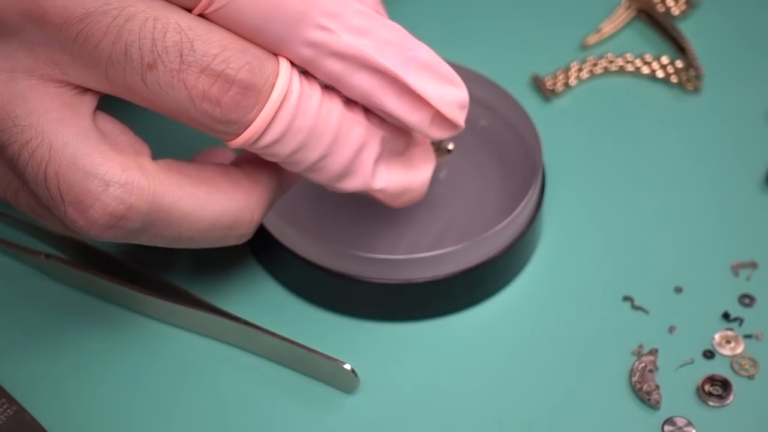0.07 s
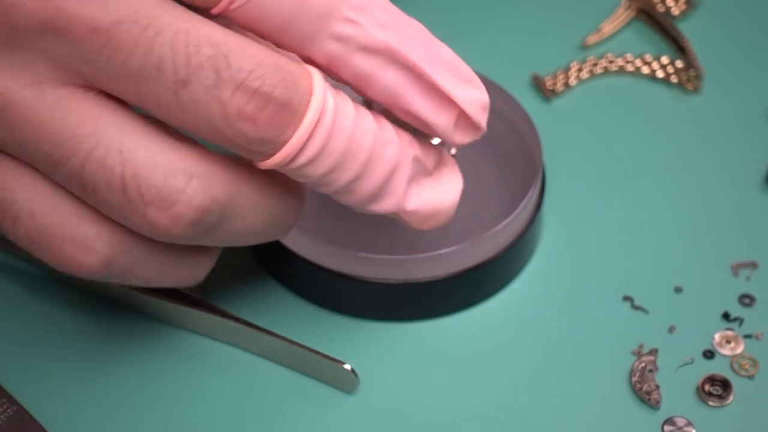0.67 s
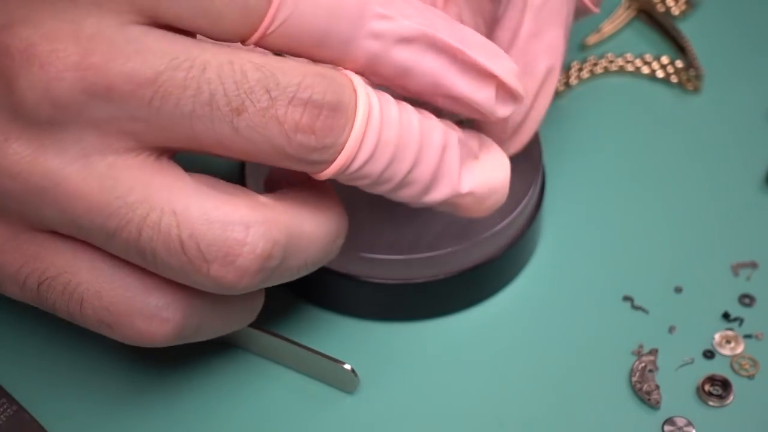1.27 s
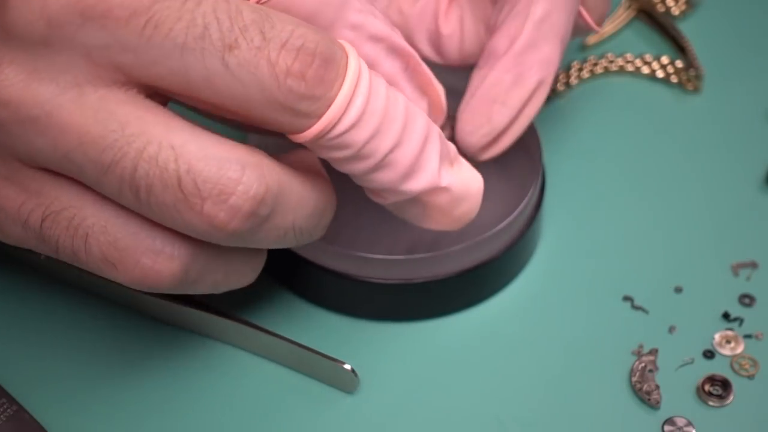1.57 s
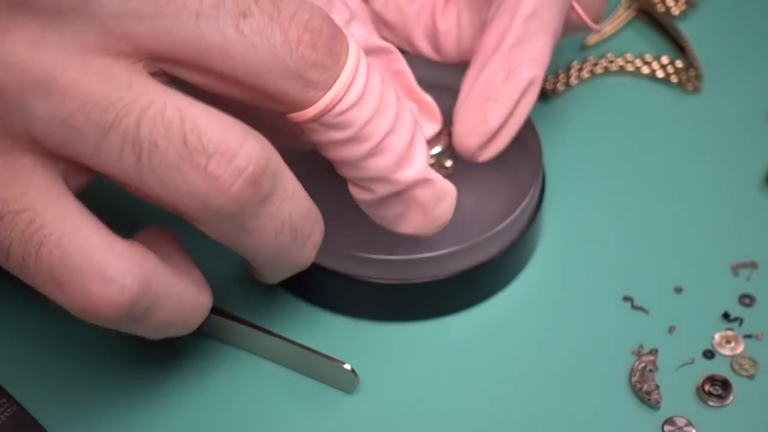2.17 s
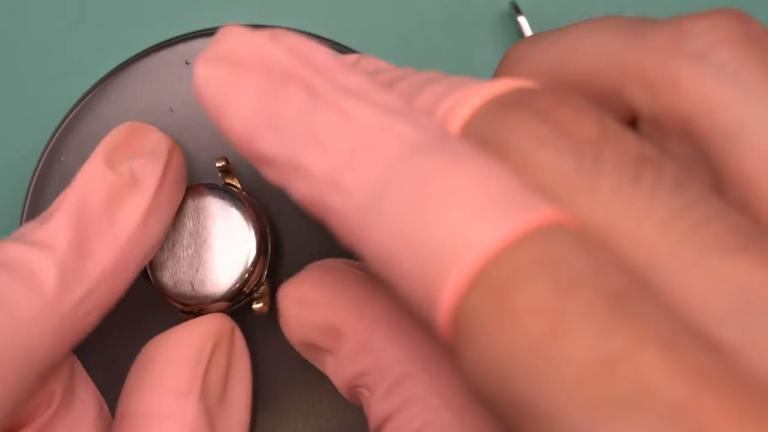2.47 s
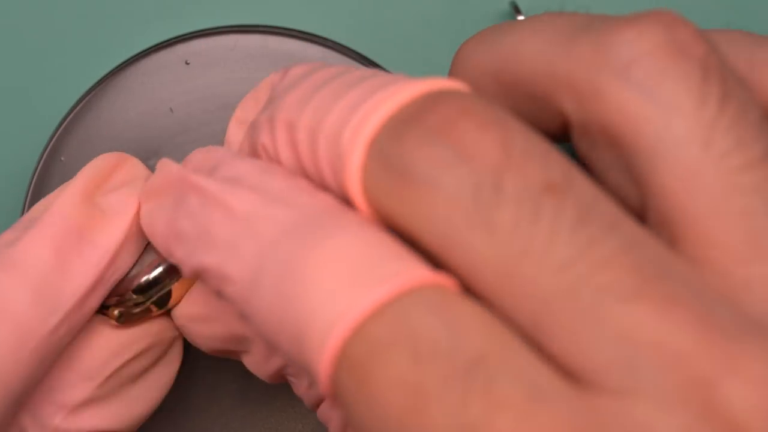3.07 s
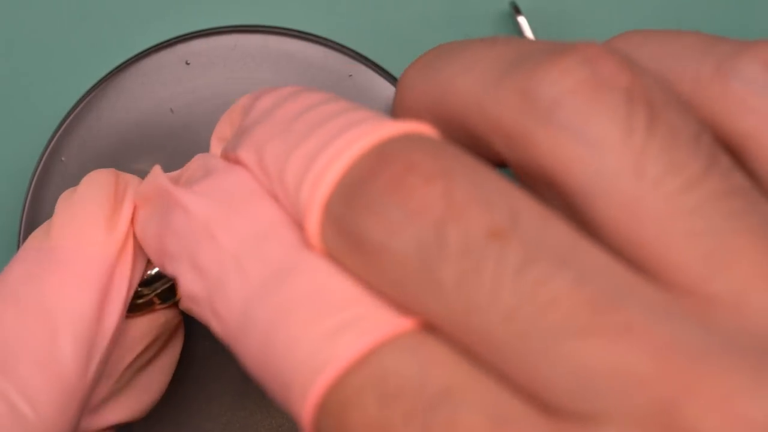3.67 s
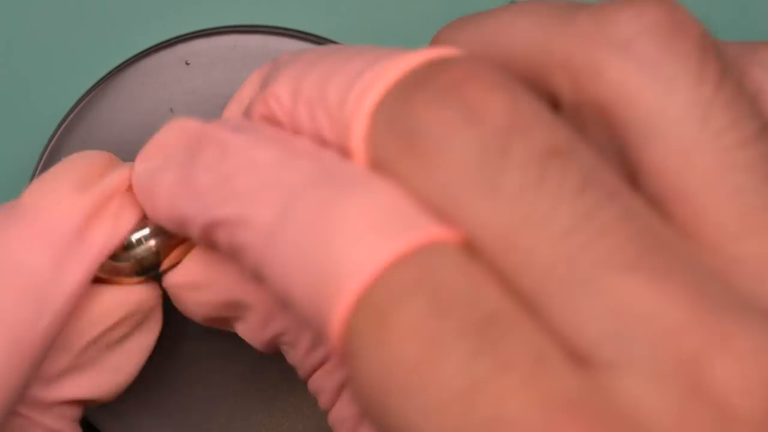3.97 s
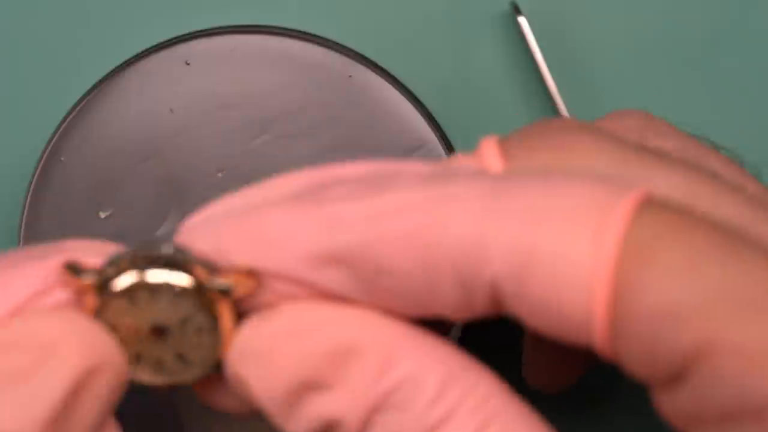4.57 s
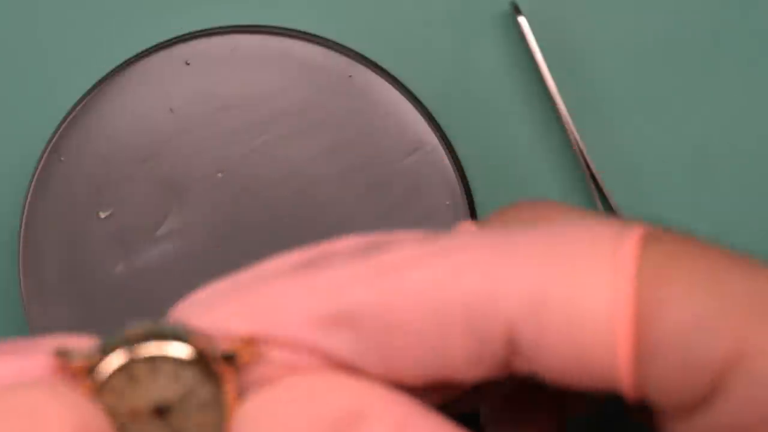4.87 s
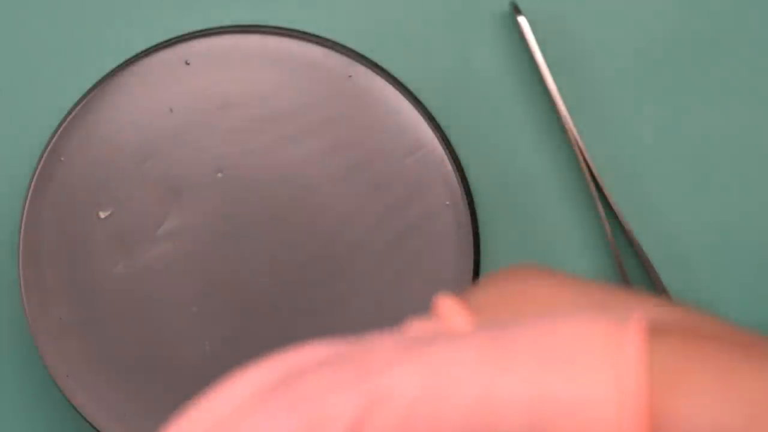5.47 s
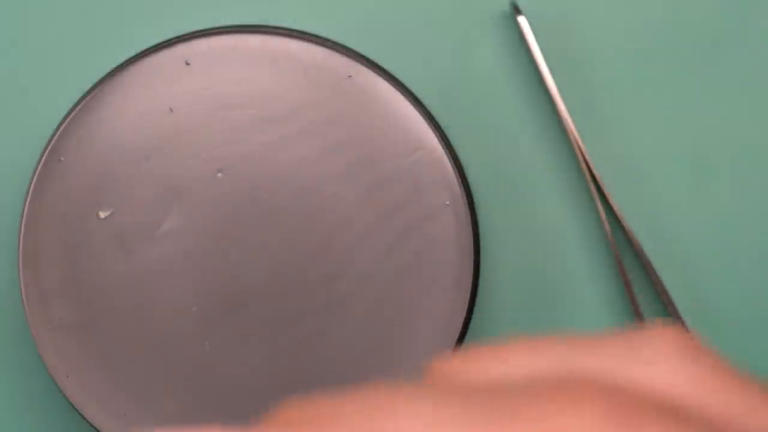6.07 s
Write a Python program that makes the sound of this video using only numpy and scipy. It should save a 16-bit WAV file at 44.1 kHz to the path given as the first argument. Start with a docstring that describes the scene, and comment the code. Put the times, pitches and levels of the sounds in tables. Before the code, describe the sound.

Rubber-covered fingers rub a small steel watch case, with one sharp snap and a later, fainter click over a soft fan hum.

```python
"""A small steel watch case is handled on a cushion, close by in a quiet room, by fingers in rubber covers.
Loose metal parts clink as they are put down. The case back snaps shut, ringing briefly and thumping
the bench, and a fainter click follows later. All along, the rubber sticks and slips on the steel,
which makes rubbing, ticks and short swishes. A fan hums steadily behind it all."""
import sys
import numpy as np
from scipy import signal
from scipy.fft import rfft, irfft
from scipy.io import wavfile

SR = 44100
rng = np.random.default_rng(int(sys.argv[2]) if len(sys.argv) > 2 else 0)


def master(y):
    """Save y as 16-bit WAV."""
    cut = np.clip(np.atleast_2d(y).T, -1, 1)
    pcm = np.round(cut * 32767)  # scale
    wavfile.write(sys.argv[1], SR, pcm.astype(np.int16))


N = 279594
T = np.arange(N) / SR

# The case back's first touch, snap and bounces. Each row: start in seconds, peak level in dB.
SNAP_HITS = [(1.96993, -31.5), (1.9707, -9), (1.97118, -14), (1.97249, -20.5), (1.9744, -30)]
SNAP_S = SNAP_HITS[1][0]  # the loudest hit


def amp(db):
    """Turns decibels into a number to multiply by."""
    return 10 ** (np.asarray(db) / 20)


def unit_level(x):
    """Scales a sound so that its average level (rms) is 1."""
    return x / np.sqrt(np.mean(x ** 2) + 1e-20)


def read_curve(points, hz):
    """Reads between a table's rows along a pitch-like (logarithmic) frequency scale."""
    point_hz, values = np.transpose(points)
    return np.interp(np.log(hz + 1), np.log(point_hz + 1), values)


def add(mix, start, sound):
    """Lays a sound into the mix at a start time in seconds."""
    part = mix[max(round(start * SR), 0):][:len(sound)]
    part += sound[:len(part)]


def filtered(x, curve):
    """Turns each frequency up or down along a curve of (Hz, dB) points."""
    freqs = np.fft.rfftfreq(len(x), 1 / SR)
    return irfft(rfft(x) * amp(read_curve(curve, freqs)), len(x))


def resonant(x, hz, width):
    """Keeps one steep-sided band of frequencies, at level 1."""
    freqs = np.fft.rfftfreq(len(x), 1 / SR)
    cut = np.sqrt(1 + (2 * (freqs - hz) / width) ** 4)
    return unit_level(irfft(rfft(x) / cut, len(x)))


def drift(rate_hz):
    """A smooth random wobble, typically 1 in size."""
    return resonant(rng.standard_normal(N), 0, 2 * rate_hz)


def grains(size, per_s, spread_db):
    """Surfaces catch and let go: many tiny clicks of uneven size at random times."""
    releases = rng.standard_normal(size) * (rng.random(size) < per_s / SR)
    return releases * amp(spread_db * np.minimum(rng.exponential(1, size), 4))


def swell(start, length, rise_share=0.25, fall_share=0.35):
    """A loudness shape that rises, holds and falls back to silence."""
    progress = (T - start) / length
    ramp = np.minimum(progress / rise_share, (1 - progress) / fall_share)
    return np.sin(np.pi / 2 * np.clip(ramp, 0, 1))


def burst(mix, peak_s, db, hz, width, rise_s, fall_s):
    """Adds a patch of tiny clicks that builds to a peak and dies away."""
    t = np.arange(-SR // 10, SR // 10) / SR
    shape = np.exp(-abs(t) / np.where(t < 0, rise_s, fall_s))
    friction = resonant(grains(len(t), per_s=12000, spread_db=0.5), hz, width)
    add(mix, peak_s + t[0], amp(db) * shape * friction)


def ring(tones):
    """Struck steel rings, scaled to peak 1; wider tones die sooner, and neighbours swing opposite ways."""
    t = T[:SR // 20]
    sound = sum((-1) ** k * amp(db) * width * np.exp(-np.pi * width * t) * np.sin(2 * np.pi * hz * t)
                for k, (hz, width, db) in enumerate(tones))
    return sound / abs(sound).max()


def fan():
    """A fan makes steady air noise, narrow ringing bands in its duct and two wavering hums."""
    # The tone of the moving air. Each row: frequency in Hz, relative level in dB.
    air_curve = [(15, -24), (28, -14.5), (40, -22.5), (65, -5.5), (90, -11), (115, -2), (250, -1.5),
                 (420, -6.5), (620, -11.5), (900, -7), (1350, -9.5), (1700, -14.5), (2250, -10.5),
                 (2600, -19), (3700, -21), (5200, -32), (7500, -35.5), (16000, -36)]
    # Where the duct rings. Each row: frequency in Hz, width in Hz, level in dB.
    duct_bands = [(491, 56, -67.5), (857, 25.35, -77), (968, 18, -74), (1026, 19, -74.5), (1229, 25, -82.5),
                  (1363, 38, -73), (2021, 39, -74), (2263, 100, -71.5)]
    # The hums. Each row: frequency in Hz, level in dB, pitch waver in Hz.
    hum_tones = [(119.2, -66.5, 3.92), (272.8, -62, 4.08)]
    air = amp(-55) * unit_level(filtered(rng.standard_normal(N), air_curve))
    duct = sum(amp(db) * resonant(rng.standard_normal(N), hz, width) for hz, width, db in duct_bands)
    hum = np.zeros(N)
    for hz, db, waver in hum_tones:
        flutter = amp(3.3 * drift(rate_hz=7.6))
        pitch = hz + waver * drift(rate_hz=7.97)
        hum += amp(db) * unit_level(flutter * np.sin(2 * np.pi * np.cumsum(pitch) / SR))
    return air + duct + hum


def clinks():
    """Loose parts chatter briefly at each touch and ring; a tiny part adds a thin, high ting."""
    # Each row: start in seconds, level in dB, chatter time in seconds, level of the ting in dB.
    touches = [(.029, -58, .004, -75), (.056, -55, 0.0067, -66), (.063, -49.5, 0.0041, -54),
               (.069, -53, .004, -60), (.098, -55.5, 0.0055, -68), (0.1834, -40.5, 0.0011, -69),
               (.188, -54, .002, -72), (0.2118, -45.5, 0.0064, -66), (.2208, -45.5, 0.0033, -52)]
    # How the loose parts ring. Each row: frequency in Hz, width in Hz, relative strength in dB.
    part_tones = [(2660, 200, -4), (3600, 420, 5.5), (4860, 330, -4), (6250, 590, 0), (8100, 270, -6),
                  (8800, 250, -2), (9700, 460, -2), (11200, 700, -12), (15100, 400, -15)]
    ting_hz, ting_fade_s = 10950, 0.0052
    contacts, tings, t = np.zeros(N), np.zeros(N), T[:SR // 20]
    ting = np.exp(-t / ting_fade_s) * np.sin(2 * np.pi * ting_hz * t)
    for start, db, chatter_s, ting_db in touches:
        chatter = unit_level(grains(len(t), per_s=7600, spread_db=-1.5))
        add(contacts, start, amp(db) * chatter * np.exp(-t / chatter_s))
        add(tings, start, amp(ting_db) * ting)
    ringing = ring(part_tones)
    return signal.oaconvolve(contacts, ringing / np.linalg.norm(ringing))[:N] + tings


def rubbing():
    """Sliding rubber sticks and slips, making a dull drag and a hiss that waver as the fingers move."""
    # Each row: start in seconds, length in seconds, level in dB, brightness in dB (higher is hissier).
    strokes = [(0.216, 0.13, -78, 8), (.51, 0.076, -69, 2), (.6, 0.24, -73.5, -2.5),
               (0.756, 0.42, -70.5, -0.5), (1.135, .11, -66.5, 2), (1.44, 0.27, -74, 3),
               (1.89, 0.25, -77, 5), (2.232, .1, -68, 4.5), (2.33, 0.12, -69, -2), (2.424, 0.27, -78, 8),
               (2.626, 0.093, -66, 0), (2.734, 0.17, -65, 2), (2.868, 0.26, -73, 4.5),
               (2.991, 0.042, -66.5, 4), (3.137, 0.13, -71.5, 3.5), (3.55, 0.28, -76, 2.5),
               (3.926, 0.068, -66, 0.5), (3.988, 0.14, -63.5, 2.5), (4.12, 0.31, -69, 1.5),
               (4.378, 0.24, -76, -3), (4.78, 0.52, -74.5, -3), (5.503, 0.75, -72, 0.5),
               (5.736, 0.24, -67.5, 4.5), (6.032, 0.064, -65, 1.5), (6.08, 0.087, -71, 8),
               (6.15, 0.21, -69, -4)]
    # The tone of the drag and of the hiss. Each row: frequency in Hz, relative level in dB.
    drag_curve = [(1500, -24.5), (2700, -4.5), (4300, -1), (5200, -2.5), (6400, 1), (7200, -10),
                  (9000, -17), (16000, -40)]
    hiss_curve = [(5000, -32.5), (7200, -11.5), (7900, 0), (9500, 0.5), (10200, -1), (11200, -9.5),
                  (12800, -9), (13800, -32), (15300, -20), (17000, -32)]
    drag_power, hiss_power = amp(-83) ** 2, amp(-81) ** 2  # a resting grip is never quite still
    for start, length, db, brightness_db in strokes:
        power = (amp(db) * swell(start, length)) ** 2
        drag_power = drag_power + power
        hiss_power = hiss_power + power * amp(brightness_db) ** 2
    drag = unit_level(filtered(grains(N, per_s=4000, spread_db=-0.5), drag_curve))
    hiss = unit_level(filtered(grains(N, per_s=10000, spread_db=2.5), hiss_curve))
    waver = amp(1.8 * drift(rate_hz=37))
    return waver * (amp(-0.5) * np.sqrt(drag_power) * drag + amp(-2.5) * np.sqrt(hiss_power) * hiss)


def ticks():
    """The grip ticks as it catches on an edge, and creeps under steady pressure in a run of fainter ticks."""
    # Single catches. Each row: time in seconds, level in dB, centre frequency in Hz.
    catches = [(.922, -58, 11000), (.995, -62, 9000), (2.365, -52, 9500), (2.411, -47.5, 8300),
               (2.659, -54.5, 9000), (3.279, -57, 8500), (3.708, -58, 6000), (3.759, -54.5, 7000),
               (3.769, -57, 6460), (3.811, -57, 5400), (3.874, -59, 5570), (4.02, -53, 8530),
               (4.381, -52, 7500), (5.781, -60, 8500), (6.047, -53, 8500)]
    creep_start_s, creep_end_s, creep_per_s = 3.46, 4.1, 30
    creep_db, creep_hz = -63.5, 5600
    creep = []
    for beat in np.arange(creep_start_s, creep_end_s, 1 / creep_per_s):
        late, force = rng.uniform(-1.1, 1, size=2)
        creep.append((beat + late / creep_per_s / 2, creep_db + 0.5 * force, creep_hz))
    out = np.zeros(N)
    for peak_s, db, hz in list(catches) + creep:
        burst(out, peak_s, db, hz, width=4200, rise_s=0.0006, fall_s=0.002)
    return out


def slips():
    """The rubber stretches, then lets go more quickly; the tighter it is, the higher it sounds."""
    # Each row: peak time in seconds, level in dB, centre in Hz, width in Hz, rough length in seconds.
    releases = [(1.227, -52.5, 6000, 3500, 0.009), (1.413, -69, 5800, 600, 0.078),
                (1.55, -68, 10600, 1400, .085), (2.27, -61, 11000, 1600, .05),
                (2.278, -60, 4600, 2000, 0.033), (2.797, -62.5, 3540, 2000, 0.077),
                (2.873, -46, 8240, 4500, 0.022), (3.179, -58.5, 5500, 1800, .022),
                (3.215, -59, 5540, 1000, .016), (3.965, -54.5, 5100, 2500, 0.017),
                (4.082, -59.5, 8000, 9000, .035), (4.23, -62, 10500, 2500, 0.065),
                (5.907, -50, 6540, 3360, 0.047), (6.219, -53.5, 3770, 2800, 0.013)]
    out, rise_share = np.zeros(N), 0.69
    for peak_s, db, hz, width, length in releases:
        burst(out, peak_s, db, hz, width, rise_share * length, (1 - rise_share) * length)
    return out


def steel_hits(hits, tones, scrape_db, scrape_fade_s):
    """Each hit rings steel that the fingers quickly hush; on the second hit, edges scrape into place."""
    out, ringing, t = np.zeros(N), ring(tones), T[:SR // 20]
    for start, db in hits:
        add(out, start, amp(db) * ringing)
    scrape = resonant(rng.standard_normal(len(t)), hz=7800, width=8960)
    add(out, hits[1][0], amp(scrape_db) * np.exp(-t / scrape_fade_s) * scrape)
    return out


def back_snap():
    """The case back touches, snaps shut and bounces, ringing each time."""
    # How the case back rings. Each row: frequency in Hz, width in Hz, relative strength in dB.
    back_tones = [(1680, 560, -25.5), (2644, 350, -24), (3960, 260, -16.5), (4300, 260, -16.5),
                  (4980, 490, -16.5), (5600, 350, -23), (6570, 280, -16), (7800, 370, -5.5),
                  (8800, 640, 1.5), (10330, 470, -0.5), (11200, 600, -12.5), (12750, 500, -24.5),
                  (15500, 440, -27.5)]
    return steel_hits(SNAP_HITS, back_tones, scrape_db=-30, scrape_fade_s=0.0025)


def bench_thump():
    """The sudden give of the snap pushes the cushion and thumps the bench."""
    # How the bench rings. Each row: frequency in Hz, level in dB, seconds to fade by 60 dB.
    bench_tones = [(114, -44, 0.24), (170, -40.5, 0.093), (271, -41, 0.31), (263, -32.5, .03),
                   (674, -30, 0.008)]
    out, t = np.zeros(N), T[:SR]
    push = 1 - np.exp(-t / 0.00025)  # the cushion softens the start
    for hz, db, fade_s in bench_tones:
        fade = np.exp(-np.log(1000) * t / fade_s)
        add(out, SNAP_S, amp(db) * push * fade * np.cos(2 * np.pi * hz * t))
    return out


def drone(hz=63, db=-67):
    """A soft, low tone comes and goes just after the snap."""
    return amp(db) * swell(start=1.98, length=0.43) * unit_level(np.sin(2 * np.pi * hz * T))


def case_click():
    """The case clicks faintly in the hand as a few small hits ring the steel."""
    # Each row: start in seconds, peak level in dB.
    click_hits = [(4.6815, -42), (4.71522, -21), (4.7158, -39), (4.7170, -34)]
    # How the held case rings. Each row: frequency in Hz, width in Hz, relative strength in dB.
    case_tones = [(1960, 260, -21), (2750, 500, -12), (3650, 420, -8.5), (4830, 580, -2.5),
                  (6150, 710, 0.5), (7700, 300, 1.5), (8300, 580, 0), (9540, 640, 3.5), (12500, 1100, -22)]
    return steel_hits(click_hits, case_tones, scrape_db=-46.5, scrape_fade_s=0.0035)


def room(x, frame_size=64):
    """The room stores the energy of each frequency band and lets it die away as noise."""
    # Each row: frequency in Hz, seconds to fade by 60 dB. The curve is above zero at every band used.
    fade_curve = [(100, 3), (1000, -0.1), (4500, 0.45), (9000, 0.5), (15000, 0.3)]
    # The tone of the echo. Each row: frequency in Hz, boost or cut in dB.
    echo_curve = [(100, -6), (1000, 11), (2800, 2.5), (5000, 0.5), (6400, 1), (7200, -3), (8000, 4),
                  (10000, -0.5), (11500, -3.5), (15000, -1.5)]
    hz, times, bands = signal.stft(x, SR, nperseg=frame_size)
    kept_per_frame = np.exp(-2 * np.log(1000) * times[1] / read_curve(fade_curve, hz))
    stored = np.array([signal.lfilter([0, 1 - kept], [1, -kept], abs(band) ** 2)
                       for band, kept in zip(bands, kept_per_frame)])
    noise = signal.stft(rng.standard_normal(N), SR, nperseg=frame_size)[2]
    tail = signal.istft(np.sqrt(stored) * noise / noise.std(), SR, nperseg=frame_size)[1][:N]
    return filtered(tail, echo_curve)


def scene():
    """Mixes the work on the case, its echoes, the fan and the drone into one channel."""
    # The hollow between the fingers shapes slips and ticks. Each row: frequency in Hz, boost or cut in dB.
    finger_hollow = [(2000, 2.5), (4400, 1), (5300, -2), (6400, 2.5), (7200, -4.5), (7900, 0.5), (9700, 2),
                     (11200, -7.5), (12700, -3), (13900, -12), (15300, -9)]
    # The case back throws its middle tones sideways into the room.
    # Each row: frequency in Hz, boost or cut in dB.
    sideways_curve = [(100, -1), (2800, 9), (3700, 6.5), (4600, 11.5), (5600, 5), (6600, 0.5), (7200, -0.5),
                      (8600, -6.5), (10000, -3), (15000, 0.5)]
    background = fan() + drone()
    snap, click, parts = back_snap(), case_click(), clinks()
    fingers = rubbing() + filtered(slips() + ticks(), finger_hollow)
    echoes = filtered(room(amp(-17.5) * snap), sideways_curve)
    echoes += room(amp(-12) * click + amp(-11) * parts + amp(-14) * fingers)
    return (snap + bench_thump() + click + parts + fingers + echoes + background)[None]


def record(dry):
    """Cuts away the very highest treble."""
    cutoff_hz = 15900
    low_pass = signal.firwin(511, cutoff_hz, window=("kaiser", 9), fs=SR)
    return signal.oaconvolve(dry, low_pass[None], "same")


dry = scene()
out = record(dry)
master(out)
```